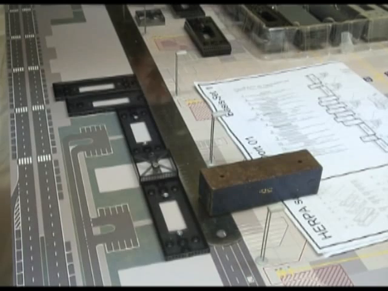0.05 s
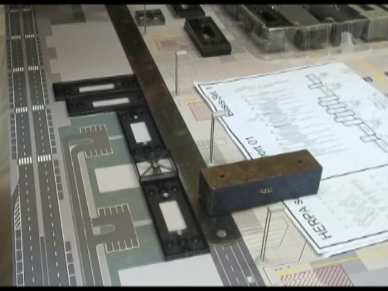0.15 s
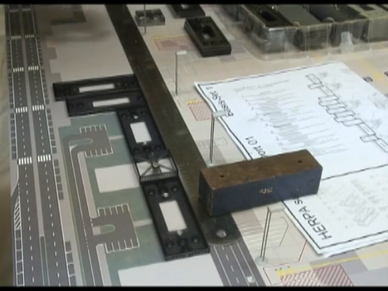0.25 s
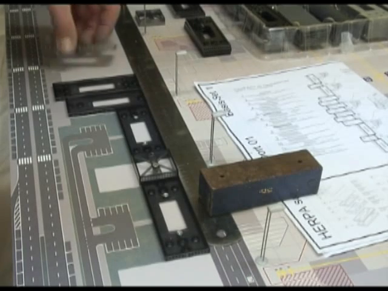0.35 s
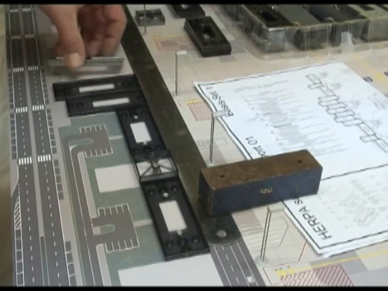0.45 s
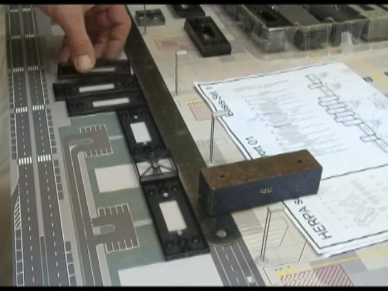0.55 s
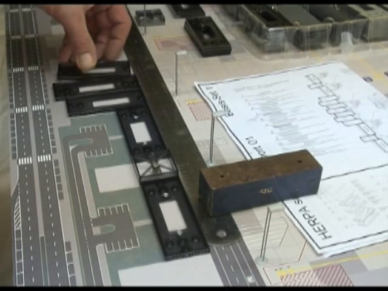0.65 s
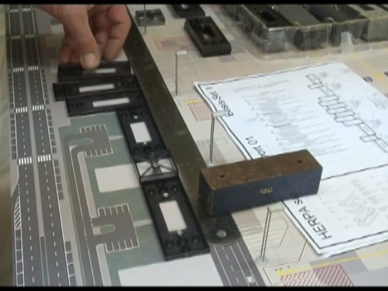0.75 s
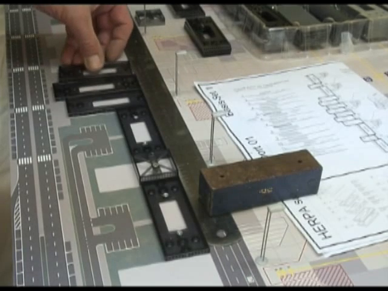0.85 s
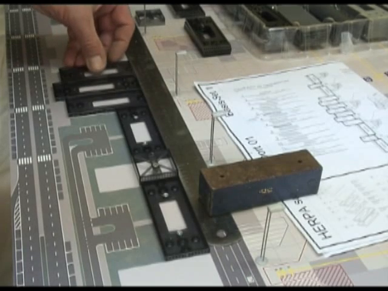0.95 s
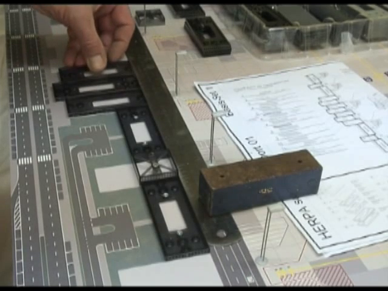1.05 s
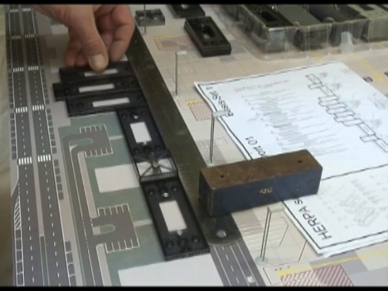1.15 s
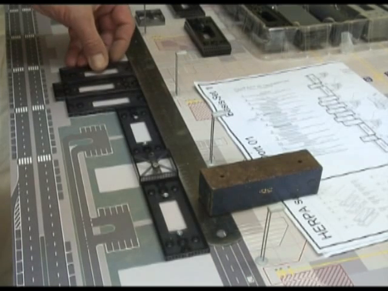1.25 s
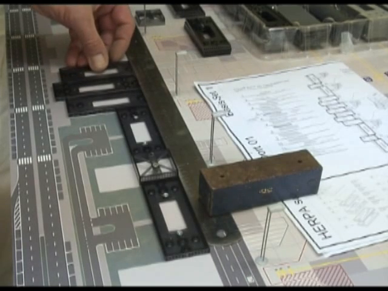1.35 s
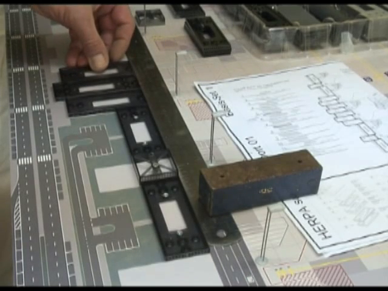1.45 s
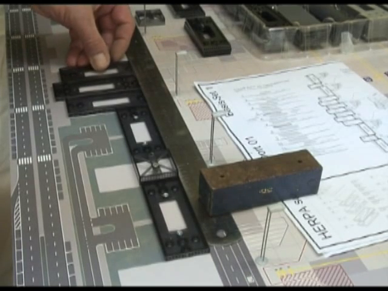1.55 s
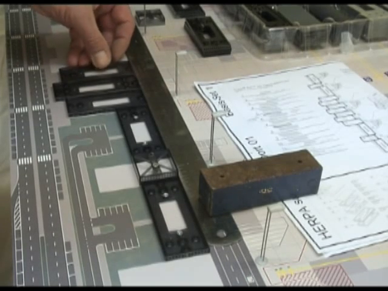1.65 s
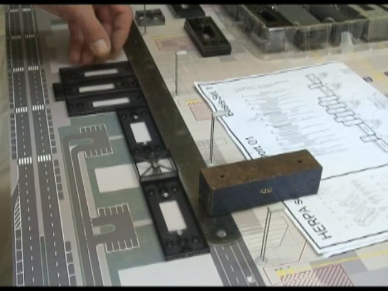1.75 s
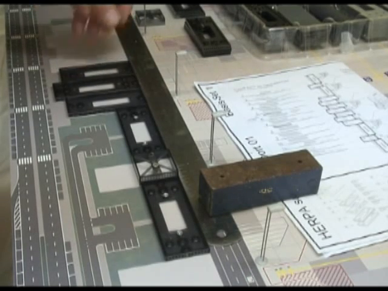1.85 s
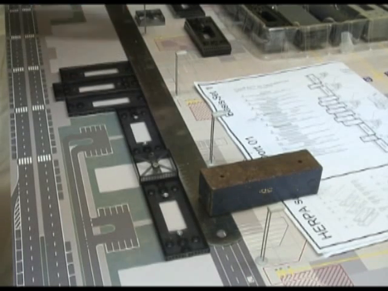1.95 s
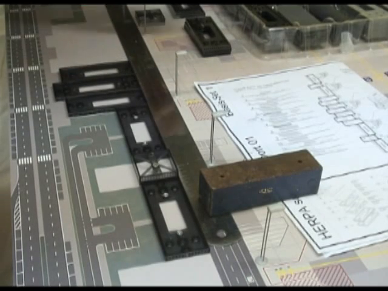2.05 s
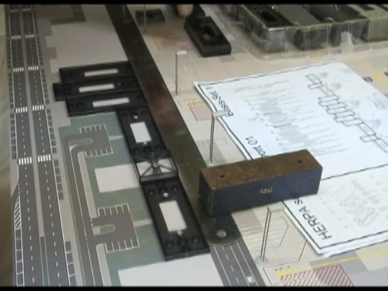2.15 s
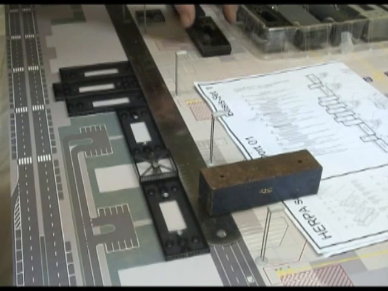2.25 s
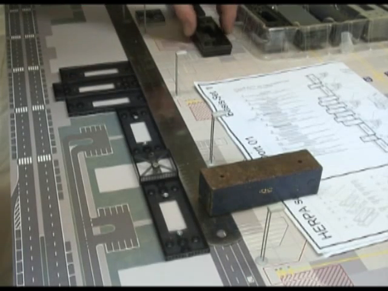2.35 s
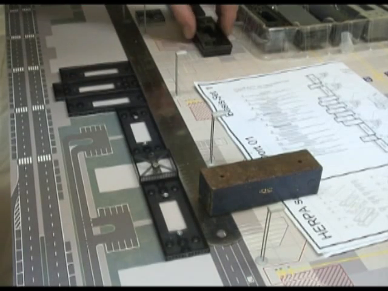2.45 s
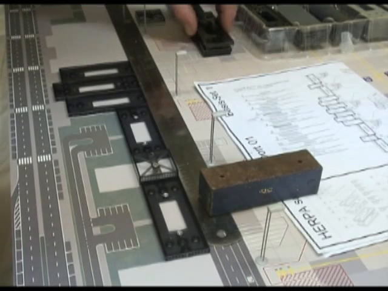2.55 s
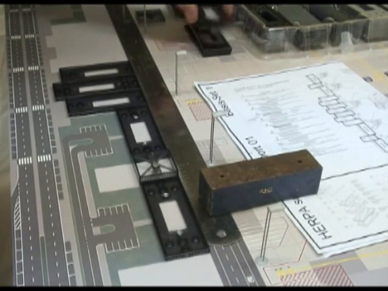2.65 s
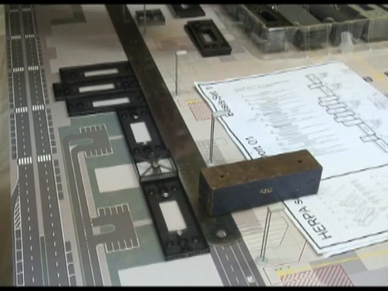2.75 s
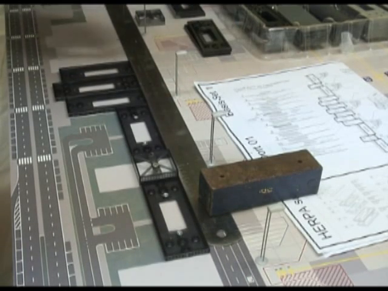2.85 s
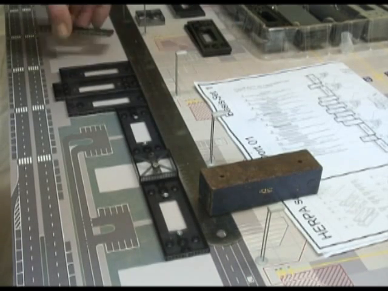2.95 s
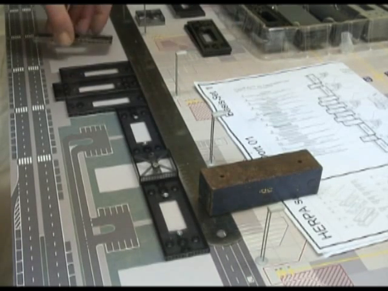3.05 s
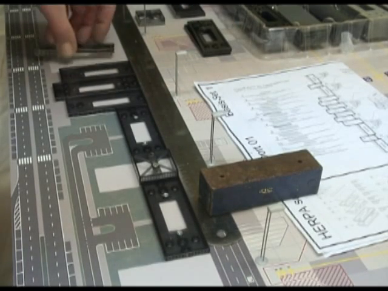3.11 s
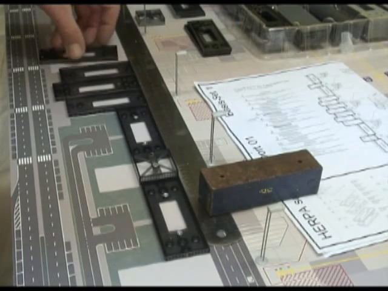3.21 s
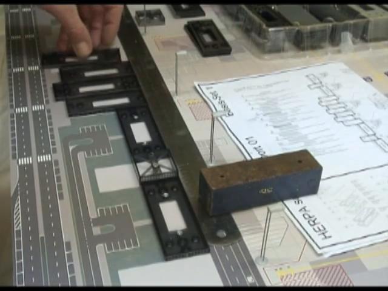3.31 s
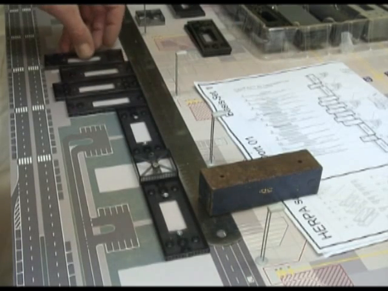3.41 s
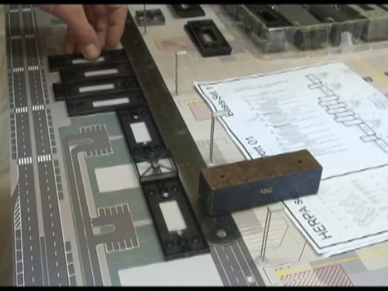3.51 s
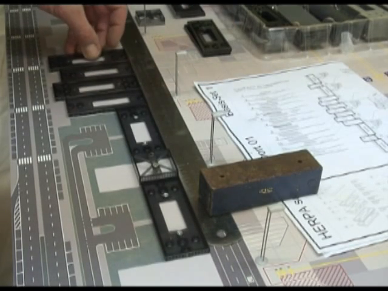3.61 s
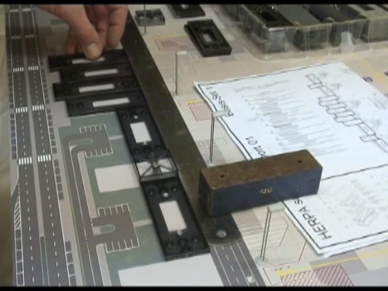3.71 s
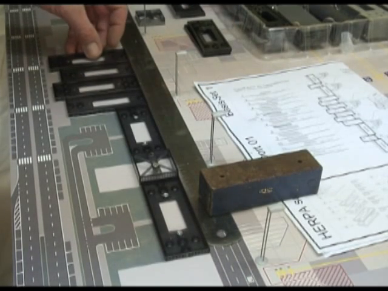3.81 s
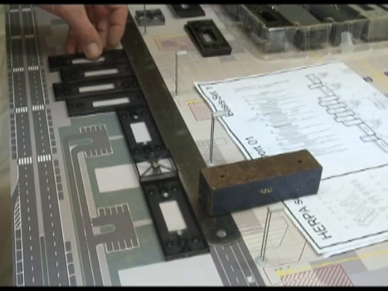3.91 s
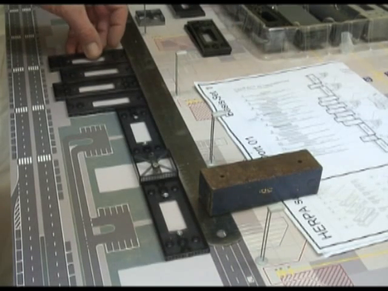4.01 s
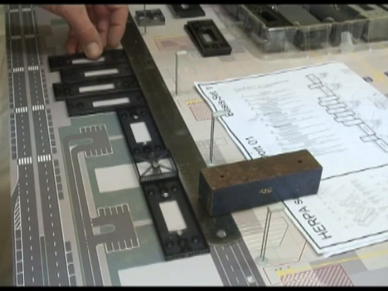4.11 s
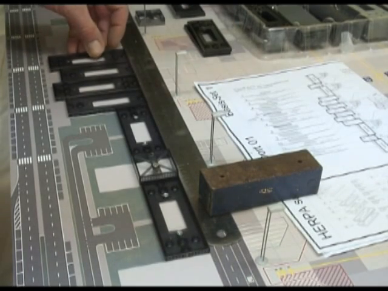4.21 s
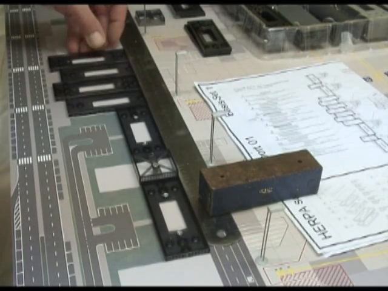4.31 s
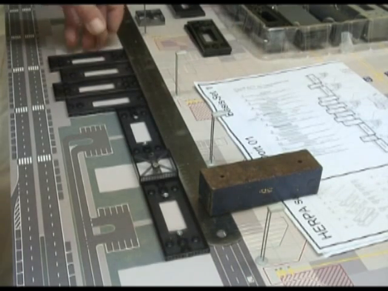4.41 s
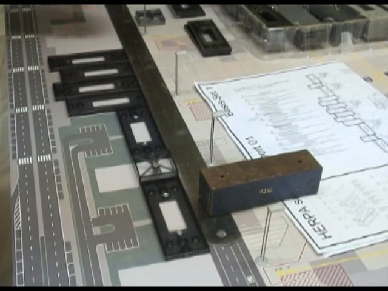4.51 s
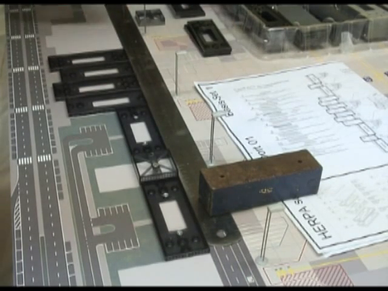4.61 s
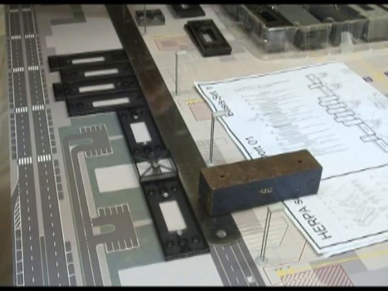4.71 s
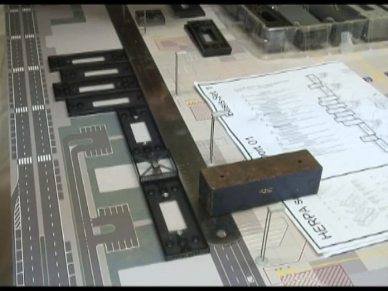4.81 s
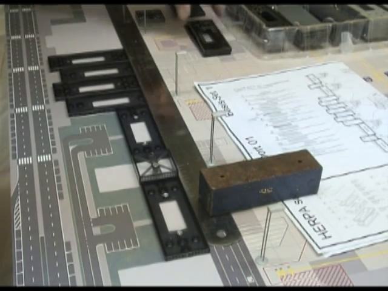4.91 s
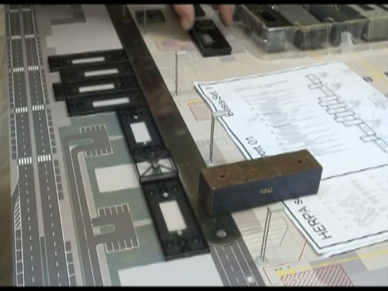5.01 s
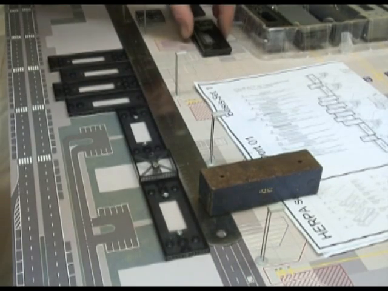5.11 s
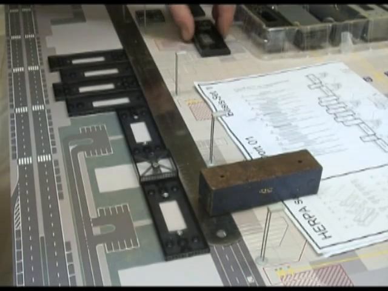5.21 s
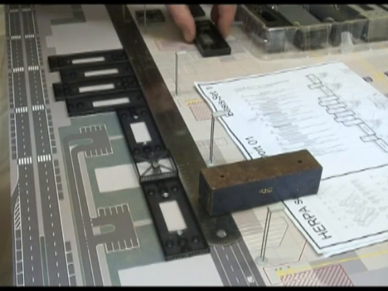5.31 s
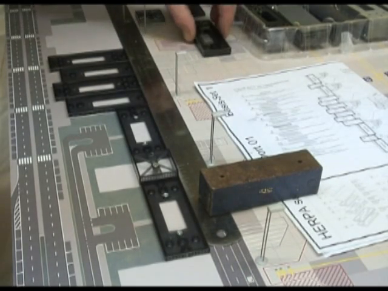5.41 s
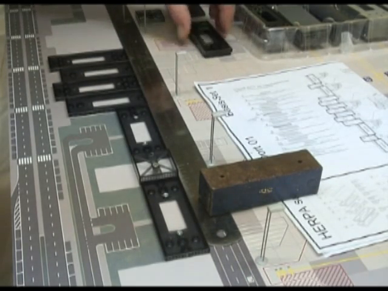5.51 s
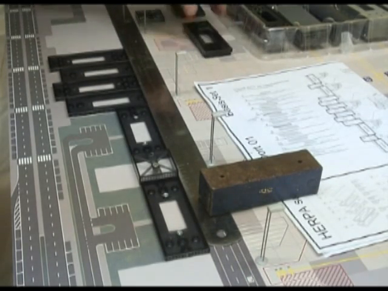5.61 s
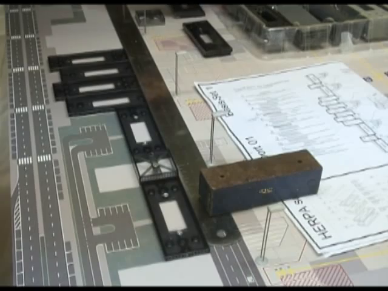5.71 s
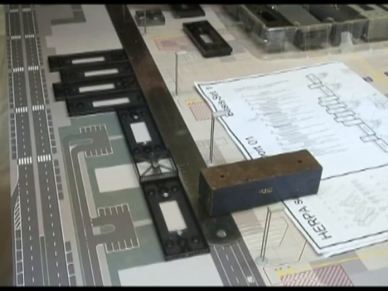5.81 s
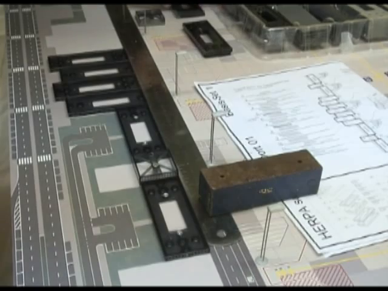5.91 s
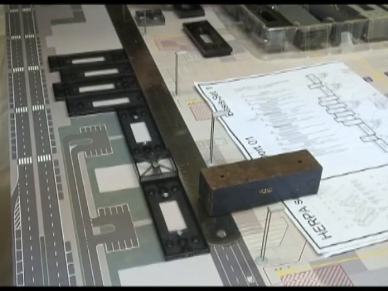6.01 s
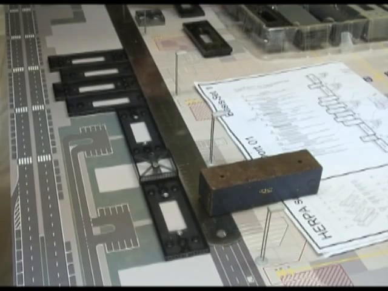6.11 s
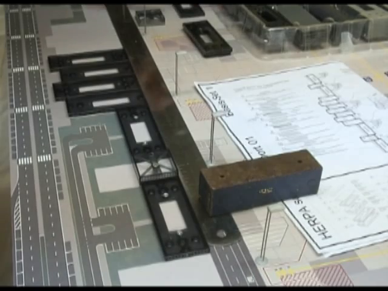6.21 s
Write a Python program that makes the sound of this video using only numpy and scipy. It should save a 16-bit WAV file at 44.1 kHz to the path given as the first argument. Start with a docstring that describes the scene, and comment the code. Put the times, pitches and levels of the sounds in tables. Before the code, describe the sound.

Thin hard plastic frames clack and rattle onto a board in two bursts, with sliding scuffs, a sharp alignment click and quiet room hiss between.

```python
"""A small room, with a camera near a board, where hard plastic frames are set down.
Hiss and a faint fan hum are filtered noise. The board booms softly when leaned on, and low pulses
thump at three of the loud blows. Fingers and parts slide: bursts of noise that swell, stick and slip.
Frames land, rattle and are nudged into line, and a small block is set down: each touch is a burst
of tiny slaps that rings the part, the board and the room. A limiter squeezes the loudest."""
import sys
import numpy as np
from scipy import signal
from scipy.fft import rfft, irfft
from scipy.io import wavfile
from scipy.ndimage import uniform_filter1d

SR = 44100
rng = np.random.default_rng(int(sys.argv[2]) if len(sys.argv) > 2 else 0)


def output_pcm(signal):
    """Save a mono or channel-first signal as 16-bit PCM at the path in sys.argv[1].

    Samples are clipped to [-1, 1] before scaling.
    """
    pcm = np.clip(np.atleast_2d(signal).T, -1, 1) * 32767
    wavfile.write(sys.argv[1], SR, np.round(pcm).astype(np.int16))


N = 276066  # length in samples


def amp(db):
    """Turns decibels into a gain."""
    return 10 ** (np.asarray(db) / 20)


def evened(x):
    """Scales a sound to an rms of one."""
    return x / np.sqrt(np.mean(x ** 2) + 1e-20)


def read(points, hz):
    """Reads a table at these frequencies, in straight lines along a logarithmic axis."""
    table_hz, value = np.transpose(points)
    return np.interp(np.log(hz + 1), np.log(table_hz + 1), value)


def add(mix, start_s, sound):
    """Mixes a sound in at its start time."""
    part = mix[:, max(round(start_s * SR), 0):][:, :sound.shape[-1]]
    part += sound[..., :part.shape[-1]]


def convolve(a, b):
    """Passes one sound through another, channel by channel."""
    return signal.fftconvolve(np.atleast_2d(a), np.atleast_2d(b), axes=1)


def noise_pair(length, likeness, colour=None):
    """Makes noise for two microphones, alike by a share that depends on frequency."""
    hz = np.fft.rfftfreq(length, 1 / SR)
    a, b = rfft(rng.standard_normal((2, length)))
    same = np.clip(read(likeness, hz), -1, 1)
    mid = a * np.sqrt((1 + same) / 2)
    side = b * np.sqrt((1 - same) / 2)
    gain = 1 if colour is None else amp(read(colour, hz))
    return irfft(np.array([mid + side, mid - side]) * gain, length)


# Colour of the hiss. Each row: frequency in Hz, relative level in dB.
HISS_COLOUR = [(15, -52), (25, -12.5), (104, -7.5), (203, -5.5), (243, -5.5), (331, -3.5), (377, -7.5),
               (429, -1.5), (475, -11), (584, -10), (861, -13.5), (1240, -16), (1440, -16), (10300, -23),
               (12000, -27.5), (15600, -62), (22000, -120)]
# How alike the hiss is left and right. Each row: frequency in Hz, likeness from -1 to 1.
HISS_LIKENESS = [(60, 0.0022), (150, -0.388), (500, -0.175), (2000, 0.285), (8000, -0.03)]
# Hum of the fan. Each row: frequency in Hz, rms level in dB.
FAN_HUM = [(328, -84), (436, -72.5)]


def background(hiss_db=-58, hum_width_hz=14):
    """Microphone hiss, and a distant fan's hum: noise in bands so narrow that it wavers."""
    hiss = noise_pair(N, HISS_LIKENESS, HISS_COLOUR)
    hiss *= amp(hiss_db) / np.std(hiss.mean(0))
    f = np.fft.rfftfreq(N, 1 / SR)
    hum = 0
    for hz, db in FAN_HUM:
        peak = 1 / (1 + ((f - hz) / hum_width_hz) ** 2)
        hum = hum + amp(db) * evened(irfft(rfft(rng.standard_normal(N)) * peak, N))
    return hiss + hum


# How alike ringing and echoes are left and right. Each row: frequency in Hz, likeness from 0 to 1.
LIKENESS = [(100, 0.85), (1200, 0.81), (2600, 0.7), (5000, 0), (12000, 0.18)]


def ring(modes):
    """Dying cosines, one for each way a body shakes; the less alike, the more out of step left and right."""
    t, out = np.arange(SR // 2) / SR, 0
    for hz, db, t60 in modes:
        apart = np.arccos(np.clip(read(LIKENESS, hz), -1, 1)) * rng.choice([-1, 1]) / 2  # radians
        wave = np.cos(2 * np.pi * hz * t + np.array([[apart], [-apart]]))
        out = out + amp(db - 60 * t / t60) * wave
    return out


def tail(db, t60s, rise_s, colour=None):
    """Dense echoes that build up and then die, each band at its own speed."""
    hz, t, z = signal.stft(noise_pair(SR * 3 // 4, LIKENESS, colour), SR, nperseg=256)
    decay = np.exp(-np.log(1000) * t / read(t60s, hz)[:, None])
    echoes = signal.istft(z * decay, SR, nperseg=256)[1]
    echoes *= 1 - np.exp(-np.arange(echoes.shape[1]) / SR / rise_s)
    return echoes * amp(db) / np.linalg.norm(echoes[0])


# Echo of the room. Each row: frequency in Hz, time to die by 60 dB in seconds.
ROOM_DECAY = [(150, 0.2457), (400, 0.3644), (1040, 0.403), (2760, 0.3239), (7280, 0.3439), (11000, 0.2339)]
# Colour of that echo. Each row: frequency in Hz, relative level in dB.
ROOM_TONE = [(100, -1), (400, 4), (1200, -2), (2300, 1.33), (4500, -1.5), (9000, -0.01)]
# Dense brief ring of the plastic and echoes off the table.
# Each row: frequency in Hz, time to die by 60 dB in seconds.
SCATTER_DECAY = [(500, 0.0728), (3000, 0.04), (9000, 0.1053)]


def response(modes, scatter_db, room_db):
    """What one click becomes: direct sound, ringing, brief clatter of plastic and table, and the room."""
    path = tail(room_db, ROOM_DECAY, rise_s=0.00152, colour=ROOM_TONE)
    path[:, 0] += 1  # the direct sound
    out = convolve(modes, path)
    add(out, 0, path)
    add(out, 0, tail(scatter_db, SCATTER_DECAY, rise_s=0.0001))
    return out


# Ringing of the board. Each row: frequency in Hz, level in dB before the touch drives it,
# time to die by 60 dB in seconds.
BOARD_MODES = [(162.36, -54, 0.537), (260, -54.5, 0.461), (349.8, -48.5, 0.154), (795, -61, 0.14),
               (1174.3, -45.5, 0.0367), (1930, -72, 0.062)]
# A hand or part leans its weight on the board. Each row: start in seconds, strength in dB.
LEAN_TIMES = [(0.023, 13.5), (2.492, 5), (3.264, 4.5), (5.264, 11.5), (5.579, 10.5)]


def leans(touch_s=0.00469, build_s=0.0119):
    """A slow push stirs mostly the board's low modes, whose boom builds up as it spreads."""
    out, push = np.zeros((2, N)), np.hanning(int(touch_s * SR))
    for start_s, db in LEAN_TIMES:
        boom = convolve(push / push.sum(), ring(BOARD_MODES))
        build_up = 1 - np.exp(-np.arange(boom.shape[1]) / SR / build_s)
        add(out, start_s, amp(db) * boom * build_up)
    return out


# Low thumps at three of the loud blows.
# Each row: start in seconds, strength in dB before the left-right balance.
THUMP_TIMES = [(0.654, -8), (0.726, -18.5), (3.2639, -10)]


def thumps(pulse_s=0.00186):
    """A low pulse that swings one way and then weakly back, a little louder on the left."""
    out, u = np.zeros((2, N)), np.arange(SR // 10) / SR / pulse_s
    pulse = (1 - u / 2) * np.exp(-u) * (1 - np.exp(-8 * u))
    for start_s, db in THUMP_TIMES:
        add(out, start_s, amp(db) * pulse)
    return out * amp([[2.2], [-2.2]])


# Basic colour of one click of plastic on the board. Each row: frequency in Hz, relative level in dB.
CLICK_COLOUR = [(30, -24.5), (110, -19), (250, -7), (500, -4), (1100, -1), (2200, -3), (3300, -2),
                (4500, -1), (7000, -4.5), (9000, -8.5), (10500, -12.5), (12000, -22.5)]


def contact(length_s, knock_db, edge_db, swell=0, size=4096):
    """A cluster of tiny slaps with an evened spectrum, coloured by how heavy and hard the touch is."""
    count = max(int(length_s * SR), 16)
    u = np.linspace(0, 1, count)
    slaps = rng.standard_normal(count) * rng.exponential(1, count) * (1 - 0.804 * u)
    if swell:  # a slide gathers speed, and sticks and slips on the way
        points = count // 120 + 2
        slips = np.interp(u, np.linspace(0, 1, points), rng.standard_normal(points))
        slaps *= np.minimum(u / swell, 1) * amp(3 * slips)
    span = count + size
    spectrum, hz = rfft(slaps, span), np.fft.rfftfreq(span, 1 / SR)
    spectrum /= np.sqrt(uniform_filter1d(abs(spectrum) ** 2, size=span // 80) + 1e-12)
    # the share of the knock (bass) and of the edge (treble) at each frequency in Hz
    knock = knock_db * read([(50, 0.28), (250, 1), (600, 0.724), (1800, 0.013)], hz)
    edge = edge_db * read([(2200, 0.0746), (4200, 0.576), (7500, 1)], hz)
    log_gain = irfft(np.log(amp(read(CLICK_COLOUR, hz) + knock + edge)), span)
    log_gain[1:span // 2] *= 2  # causal: the colouring adds nothing before the touch
    log_gain[span // 2 + 1:] = 0
    return irfft(spectrum * np.exp(rfft(log_gain)), span)[:count + size // 2]


# Fingers and parts slide on the board.
# Each row: start in seconds, length in seconds, force in dB, extra treble in dB.
SCUFF_TIMES = [ (0.911, 0.0087, -10, -23), (0.958, 0.057, -6, -14.5), (1.228, 0.0166, -15.5, -11),
               (2.442, 0.0272, -11.5, -14.5), (2.553, 0.0323, -19.5, -6), (3.502, 0.0692, -6, -25),
               (3.574, 0.0123, -10, -16), (3.595, 0.021, -10, -12), (3.741, 0.01206, -21.5, -27.5),
               (5.195, 0.0237, -14.5, -16), (5.237, 0.0646, -10, -5.5), (5.528, 0.038, -16.5, -0.5),
               (5.559, 0.0308, -9.5, -15), (5.913, 0.0111, -21, -8), (5.957, 0.0805, -15.5, -8)]


def scuffs(knock_db=-2.5, knock_db_per_db=-0.58):
    """Long soft contacts that stir only the board; the lighter the slide, the more it rumbles."""
    out = np.zeros((2, N))
    for start_s, length_s, db, edge_db in SCUFF_TIMES:
        slide = contact(length_s, knock_db + knock_db_per_db * db, edge_db, swell=0.271)
        board = response(ring(BOARD_MODES), scatter_db=1.5, room_db=-1.0)
        add(out, start_s, amp(db) * convolve(slide, board))
    return out


# Ringing of the parts: one list each for the first frame, the second frame and the small block.
# Each row: frequency in Hz, level in dB before the touch scales it, time to die by 60 dB in seconds.
PART_MODES = [
    [(1092, -46, .18), (1550, -45, .1), (2050, -45, .14), (2190, -39, .15), (2280, -36, .05),
     (4230, -32, .06), (4352, -41, .14), (6240, -44.5, 0.089), (6032, -32, 0.065), (6927, -35.5, 0.091),
     (7740, -44, .09), (8446, -48, 0.162), (9403, -26.5, 0.061), (9510, -28.5, 0.136), (11020, -30, 0.109),
     (11140, -46, 0.19)],
    [(1790, -43, .16), (2110, -39, .05), (2309, -42, .15), (2643, -40, .07), (4230, -44, .03),
     (7226, -38, .12), (8742, -46, .08), (11790, -30, .12)],
    [(1828.5, -25.5, .09), (1948, -29, 0.047)],
]


def strike(part, length_s, knock_db, edge_db, ring_db, room_db):
    """One contact rings its part and the board beneath."""
    part_modes = PART_MODES[min(round(part), len(PART_MODES) - 1)]
    modes = amp(ring_db) * ring(part_modes) + ring(BOARD_MODES)
    touch = contact(length_s, knock_db, edge_db)
    return convolve(touch, response(modes, scatter_db=0.5, room_db=room_db))


# A frame is pushed sideways until it clicks against the steel rule.
# Each row: start in seconds, which part (0 or 1, the frames), force in dB, extra treble in dB.
NUDGE_TIMES = [(0.9943, 0, 1, -15), (0.9979, 0, 14, -7.5), (3.6080, 1, 4.5, -18)]


def nudges(length_s=0.003, knock_db=-12, ring_db=-6.5, room_db=-3.5):
    """Thin, dry clicks of a frame held by the fingers: brief touches that hardly load the board."""
    out = np.zeros((2, N))
    for start_s, part, db, edge_db in NUDGE_TIMES:
        add(out, start_s, amp(db) * strike(part, length_s, knock_db, edge_db, ring_db, room_db))
    return out


# A frame or the block lands on the board. Each row: start in seconds, which part (0 and 1 are
# the frames, 2 the block; rounded to a whole number), length of the contact in seconds,
# force in dB, extra treble in dB, ring of the part in dB.
CLACK_TIMES = [ (0.0189, 0, 0.00293, 13.5, 2, -13.5), (0.0395, 0, 0.0138, 6.5, 7, -3.5),
               (0.5020, 0, 0.00273, -11, -17.5, -10.5), (0.5990, 0, 0.00166, 1.5, -26.5, 11.5),
               (0.6160, 0, 0.00277, 6.5, -19.5, 2.5), (0.6540, 0, 0.000754, 21, 4, -3.5),
               (0.6925, 0, 0.01115, 20.5, -3.5, -11), (0.7281, 0, 0.00262, 18, -5.5, -10.5),
               (0.7590, 0, 0.0039, -1, -18.5, -15), (1.2360, 0.5, 0.007, -7, -21.5, -10.5),
               (3.1810, 1, 0.00205, -12.5, -11.5, -11), (3.1900, 1, 0.0014, -1.5, -14, -19),
               (3.232, 1, .0023, 13.5, -7.5, -13.5), (3.2360, 1, 0.00246, 11.5, -8, 5.5),
               (3.2637, 1, 0.0015, 18, 4.5, -4.5), (3.289, 1, 0.03, 17, 0, -3.5),
               (3.5707, 1, 0.00219, -4, -34, -14.5), (6.0610, 2, 0.00168, -18.5, -4.5, -5.5)]
KNOCK_DB, KNOCK_DB_PER_DB = 2, -0.372  # a gentle landing is mostly a dull knock; force takes bass away
KNOCK_DB_PER_OCTAVE, TYPICAL_CONTACT_S = -1.6, 0.00266  # so does each doubling of the contact's length


def clacks():
    """Parts land and rattle; hard or drawn-out blows have a smaller share of knock."""
    out = np.zeros((2, N))
    for start_s, part, length_s, db, edge_db, ring_db in CLACK_TIMES:
        doublings = np.log2(length_s / TYPICAL_CONTACT_S)
        knock_db = KNOCK_DB + KNOCK_DB_PER_DB * db + KNOCK_DB_PER_OCTAVE * doublings
        # every landing is at the same distance in the same room
        add(out, start_s, amp(db) * strike(part, length_s, knock_db, edge_db, ring_db, room_db=-0.5))
    return out


def scene():
    """Blows, slides, booms and thumps over the quiet of the room."""
    return background() + leans() + thumps() + scuffs() + nudges() + clacks()


def lag(x, seconds):
    """Smooths a signal with one pole."""
    r = np.exp(-1 / (seconds * SR))
    return signal.lfilter([1 - r], [1, -r], x)


def record(dry, threshold_db=-13, recovery_db_per_s=200, squeeze=0.289, ceiling=0.604, edge_hz=12050):
    """A fast limiter lets the first spike overload, ducks what follows and recovers; then treble is cut."""
    power_db = 10 * np.log10(lag((dry ** 2).mean(0), seconds=0.000513) + 1e-12)
    fall = np.arange(N) / SR * recovery_db_per_s
    held_db = np.maximum.accumulate(power_db + fall) - fall  # peaks, sinking steadily
    over_db = np.maximum(held_db - threshold_db, 0)
    ducked = dry * amp(-squeeze * lag(over_db, seconds=0.00015))
    clipped = ducked / (1 + (ducked / ceiling) ** 4) ** (1 / 4)  # soft overload
    low_pass = signal.firwin(301, edge_hz, window=("kaiser", 8), fs=SR)
    return signal.oaconvolve(clipped, low_pass[None], "same", axes=1)


dry = scene()
out = record(dry)
output_pcm(out)
```